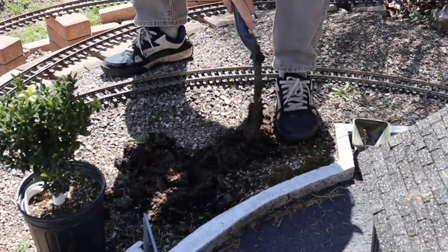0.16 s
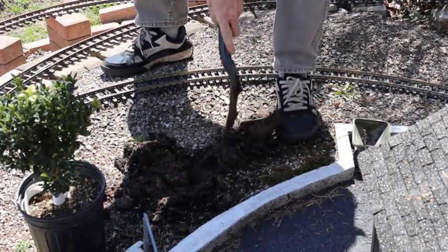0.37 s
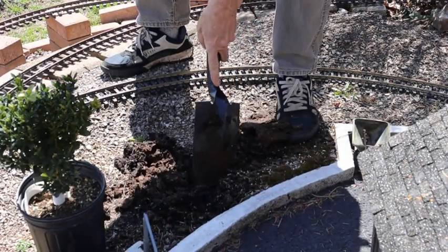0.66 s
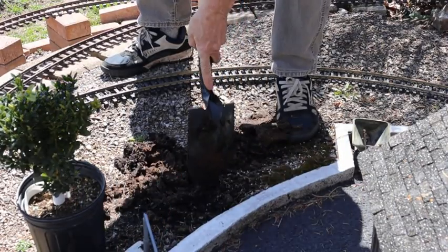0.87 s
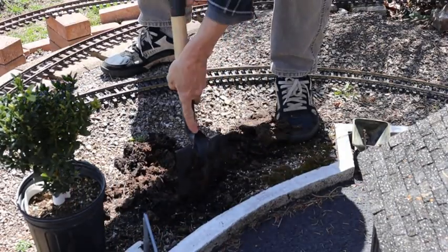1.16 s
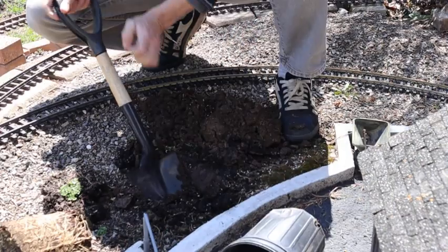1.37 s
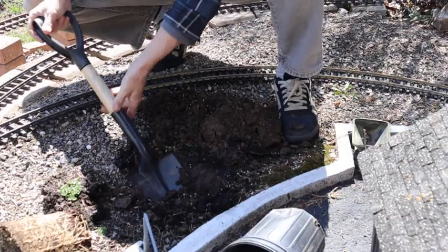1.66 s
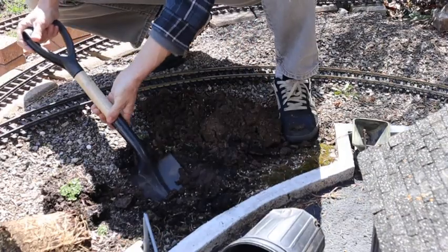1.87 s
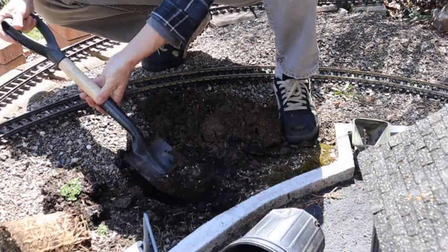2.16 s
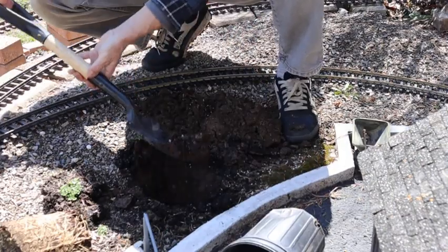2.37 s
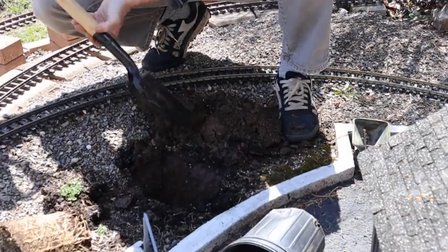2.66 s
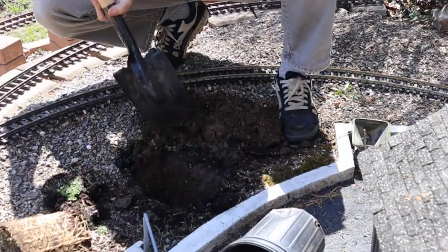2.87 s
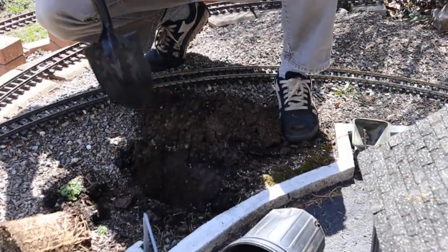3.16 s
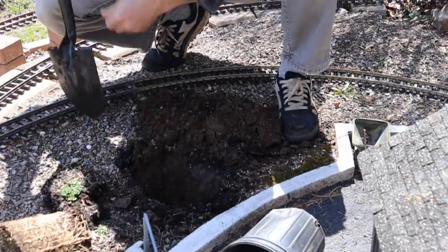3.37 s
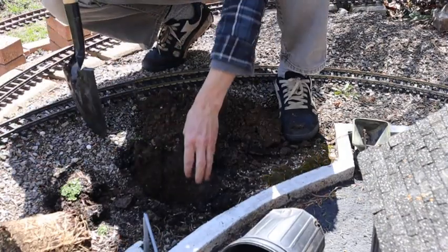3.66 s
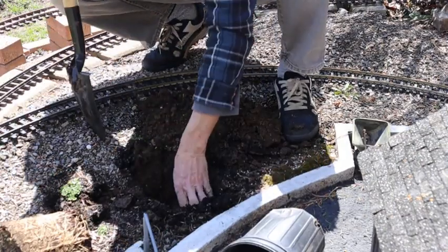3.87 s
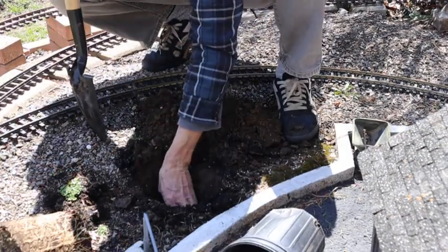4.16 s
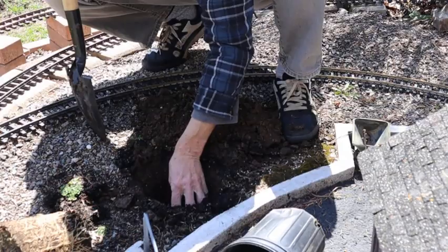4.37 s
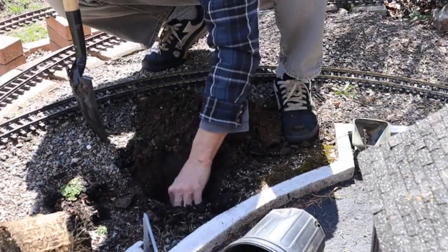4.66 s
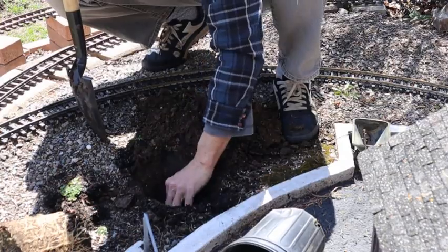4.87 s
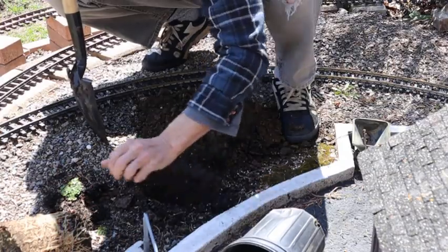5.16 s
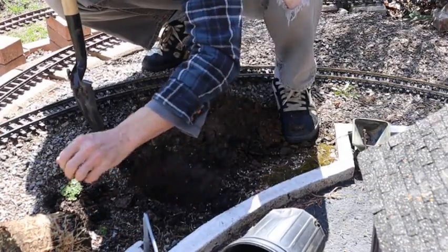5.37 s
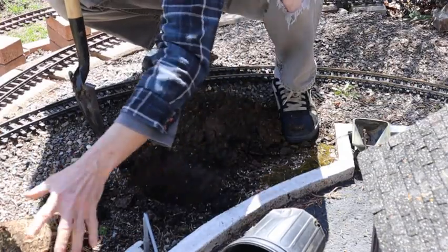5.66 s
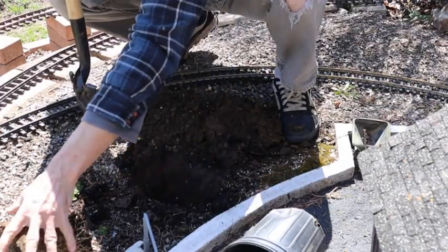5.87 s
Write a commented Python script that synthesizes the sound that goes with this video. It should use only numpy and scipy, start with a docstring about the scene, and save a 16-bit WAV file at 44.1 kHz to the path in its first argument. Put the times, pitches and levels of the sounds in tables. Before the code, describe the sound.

Close to the microphone, a small spade scrapes faintly in soil and gravel, then bites with bright crunches and a very loud, dull woody knock with cracking stones. Softer scrapes and tiny stone ticks follow. The blade is stabbed upright with a brief metallic clang and a gritty snap, then a hand rustles soil delicately. Quiet open garden, distant town wash and light low wind, nearly mono.

```python
"""Spade in garden soil

A small steel spade works soil beside gravel, close to a camera on a stand: filtered noise crackles as grit.
Noise bursts are cracking stones, damped low tones are knocks, and dying sines are the blade's clangs and pings.
The blade is stuck upright with a clang, then a hand rustles the soil. Hard blows shake the camera stand.
Distant town wash and light wind, both shaped noise, fill the garden."""
import sys
import numpy as np
from scipy import signal
from scipy.fft import rfft, irfft, next_fast_len
from scipy.io import wavfile
from scipy.ndimage import uniform_filter1d

SR = 44100
rng = np.random.default_rng(int(sys.argv[2]) if len(sys.argv) > 2 else 0)


def bounce(signal):
    """Save signal as a 16-bit WAV file at the path given by the first command-line argument."""
    frames = np.transpose(np.atleast_2d(signal))
    limited = np.clip(frames, -1, 1)
    pcm = np.round(limited * 32767).astype(np.int16)
    wavfile.write(sys.argv[1], SR, pcm)


N = 265923

# Basic colour of grit, before each layer's own tilt. Each row: frequency in Hz, relative level in dB.
GRIT_COLOUR = [(600, -30), (1100, 0), (1700, 2), (2400, -0.5), (3600, -0.5), (5450, -4), (6100, -11),
               (6900, -6.5), (9000, -8), (11700, -8), (14500, -14.5), (16500, -35)]
# Stones and grit cracking. Each row: start in seconds, level in dB before the layer weights, colour in Hz.
STONE_CRACKS = [(0.082, -33, 1470), (0.39, -37, 4000), (1.025, -13, 3100), (1.066, -13.5, 3700),
                (1.075, -15.5, 11000), (1.142, -35, 7360), (1.212, -32.5, 1610), (1.322, -25, 2240),
                (1.3645, -40, 1980), (1.386, -26, 9100), (1.405, -25, 1850), (1.418, -25, 3480),
                (1.424, -27, 2440), (1.4437, -17, 1670), (1.4448, -14, 1750), (1.4507, -5.5, 1820),
                (1.4584, -3, 1720), (1.463, -39, 1850), (1.5, -25, 1720), (1.517, -29, 4040),
                (1.526, -28, 7040), (1.55, -24, 1760), (1.62, -36, 3000), (1.6922, -27, 4500),
                (1.965, -27, 7000), (1.9731, -19.5, 2420), (1.978, -25, 5160), (1.9837, -23.5, 2430),
                (2.007, -32, 2240), (2.027, -27.5, 4600), (2.0654, -30.5, 2570), (2.114, -33.5, 4400),
                (2.136, -35.5, 1750), (2.724, -41, 8900), (2.882, -33, 3520), (3.3869, -7.5, 1530),
                (3.3872, -10, 4700), (3.5677, -9, 3350), (3.6133, -25, 8500), (3.669, -25.5, 9400),
                (3.95, -43, 6900), (3.985, -34, 2500), (4.523, -38.5, 4580), (5.099, -38.5, 7900),
                (5.144, -36, 4600), (5.1825, -33, 4460), (5.2243, -35, 4600), (5.243, -25, 10100),
                (5.386, -41, 8920), (5.483, -36, 8000), (5.5037, -30.5, 8900), (5.5301, -27.5, 8900),
                (5.584, -28.5, 6470), (5.615, -32, 4530), (5.64, -32, 5250), (5.685, -32.5, 3000),
                (5.728, -24.5, 2620), (5.731, -26, 8000), (5.742, -40, 2500), (5.822, -39, 3500),
                (5.8535, -30, 3180)]


def gain_of(db):
    """Decibels to amplitude gain."""
    return 10 ** (np.asarray(db) / 20)


def evened(x):
    """Scales to rms 1."""
    return x / np.sqrt(np.mean(x ** 2) + 1e-20)


def add(mix, s, sound):
    """Mixes a sound in at s seconds, cut off at the end of the mix."""
    part = mix[round(s * SR):][:len(sound)]
    part += sound[:len(part)]


def coloured(x, points):
    """Filters x by a gain curve through points (Hz, dB), straight over log frequency."""
    size = next_fast_len(len(x))
    f, db = np.transpose(points)
    hz = np.fft.rfftfreq(size, 1 / SR)
    gain = gain_of(np.interp(np.log(hz + 1), np.log(f), db))
    return irfft(rfft(x, size) * gain, size)[:len(x)]


def ring(modes, seconds, rise, tilt_db=0):
    """Sum of dying sines (Hz, dB, t60 s) with a soft start; tilt_db lifts the first mode."""
    t = np.arange(round(seconds * SR)) / SR
    total = np.zeros(len(t))
    for i, (hz, db, t60) in enumerate(modes):
        lift_db = tilt_db if i == 0 else 0
        total += gain_of(db + lift_db - 60 * t / t60) * np.sin(2 * np.pi * hz * t)
    return total * (1 - np.exp(-t / rise))


def garden():
    """A distant wash whose bands drift in patches, and lumpy wind in the bass: both are shaped noise."""
    # Colour of the wash. Each row: frequency in Hz, relative level in dB.
    wash_colour = [(41, -41), (70, -5), (118, -1), (145, -8.5), (205, -6.5), (252, -10), (488, -8.5),
                   (688, -10), (826, -10), (2010, -21), (2840, -25.5), (3260, -28.5), (14700, -35.5),
                   (16500, -33)]
    # Swell of the wind. Each row: time in seconds, level in dB.
    wind_curve = [(0.0, -59), (1.07, -56), (1.17, -64), (2.84, -64), (3.368, -56), (6.03, -55)]
    wash_db = -49
    frames = N // 256 + 5
    real, imag, patches = rng.standard_normal((frames, 513, 3)).T
    # smoothed over frequency, then over time
    patches = evened(uniform_filter1d(uniform_filter1d(patches, 12, 0), 16, 1))
    spectrum = (real + 1j * imag) * gain_of(1.03 * patches)
    drifting = signal.istft(spectrum, nperseg=1024, noverlap=768)[1][:N]
    wash = evened(coloured(drifting, wash_colour))

    s, wind_db = np.transpose(wind_curve)
    rumble = coloured(rng.standard_normal(N), [(8, -30), (20, 16.5), (35, -7), (60, 11.5), (90, -30.0)])
    wind = evened(rumble) * gain_of(np.interp(np.arange(N) / SR, s, wind_db))
    return gain_of(wash_db) * wash + wind


def stand():
    """The camera stand hums in its low modes, each hum with a soft swell after a jolt."""
    # Modes of the stand. Each row: frequency in Hz, relative level in dB, t60 in seconds.
    stand_modes = [(59.5, -10.5, 0.53), (87, -1.5, 0.6), (100, -5, 0.46), (107.7, -2, 0.86)]
    # Jolts through the ground. Each row: start in seconds, level in dB, lift of the lowest mode in dB.
    jolts = [(1.216, -49.5, 23.5), (1.459, -32, -18), (1.508, -31.5, -11), (1.57, -39, -11),
             (3.398, -33, -10), (3.449, -29, 8)]
    out = np.zeros(N)
    for s, db, tilt_db in jolts:
        add(out, s, gain_of(db) * ring(stand_modes, seconds=1.2, rise=0.017, tilt_db=tilt_db))
    return out


def pings():
    """Small stones slide off the lifted blade, each ringing one short note."""
    # The notes. Each row: start in seconds, level in dB, pitch in Hz.
    notes = [(2.724, -50, 2120), (2.738, -45, 2070), (2.783, -46, 2450), (2.79, -50, 3950),
             (2.882, -44, 3800)]
    t60_s = .08
    out = np.zeros(N)
    for s, db, hz in notes:
        add(out, s, ring([(hz, db, t60_s)], seconds=.1, rise=.001))
    return out


def clangs():
    """The steel blade meets stone and rings in its modes until the soil grips it."""
    # Modes of the blade. Each row: frequency in Hz, relative level in dB, t60 in seconds.
    blade_modes = [(1095, -5.5, 0.64), (1555, -11, 0.3), (1948, -8, 0.27), (2096, -13, 0.2),
                   (2126, -9, 0.25), (2395, -9, 0.13), (2578, -4, 0.19), (2765, -12, 0.17), (4152, -5, 0.1)]
    # Blows on stone. Each row: start in seconds, level in dB, seconds until soil stops the blade,
    # lift of the lowest mode in dB.
    blows = [(3.388, -27, 0.22, -4.5), (3.569, -29.5, 0.039, -25)]
    out = np.zeros(N)
    for s, db, seconds, low_db in blows:
        sound = ring(blade_modes, seconds, rise=0.0012, tilt_db=low_db)
        grip = np.minimum(np.linspace(8, 0, len(sound)), 1)  # fades over the last eighth
        add(out, s, gain_of(db) * sound * grip)
    return out


def knocks():
    """Blade and shaft on packed soil: a low, heavily damped wobble, roughened by crushed soil."""
    # The knocks. Each row: start in seconds, peak in dB, pitch in Hz.
    dull_knocks = [(1.024, -31, 604), (1.143, -24.5, 317), (1.169, -19, 423), (1.174, -24, 454),
                   (1.318, -26.5, 430), (1.364, -19.5, 456), (1.401, -18, 447), (1.417, -12.5, 445),
                   (1.443, -17, 517), (1.448, -4, 501), (1.451, -1.5, 462), (1.454, -17, 278),
                   (1.458, -7.5, 468), (1.466, -18, 414), (1.503, -31, 390), (1.52, -29, 415),
                   (1.547, -31.5, 580), (1.691, -29, 460), (1.705, -29.5, 388), (1.725, -36, 346),
                   (1.973, -30.5, 405), (1.99, -32, 378), (3.387, -23.5, 340), (3.387, -17, 888),
                   (3.393, -30, 220), (5.728, -28.5, 920)]
    cycles, rise_s = 9.5, .004  # cycles of the main pitch for a 60 dB decay, soft start
    rough, length_s = .3, .12  # rms depth of the random flutter, time allotted to a knock
    out = np.zeros(N)
    spread = rng.random((len(dull_knocks), 2))
    noise = rng.standard_normal((len(dull_knocks), round(length_s * SR)))
    for (s, db, hz), (low, high), z in zip(dull_knocks, spread, noise):
        t60 = cycles / hz
        below = (hz * (0.55 + 0.15 * low), -11, t60)
        above = (hz * (1.45 + 0.4 * high), -13, t60)
        wobble = ring([(hz, 0, t60), below, above], length_s, rise_s)
        crush = evened(coloured(z, [(hz, 0), (4 * hz, -12), (16 * hz, -40)]))
        sound = coloured(wobble * (1 + rough * crush), [(hz / 4, -30), (hz / 2, 0)])  # bass cut
        add(out, s, gain_of(db) * sound / abs(sound).max())
    return out


def bells():
    """The short rings of the grit, one row for each, together of energy 1."""
    # Where grit rings. Each row: frequency in Hz, width in Hz (wider dies faster), relative level in dB.
    grit_modes = [(2450, 90, 0), (3800, 150, -8), (4600, 80, -5), (5180, 130, -4), (7900, 120, -8),
                  (8800, 140, -7), (10200, 160, -8)]
    t = np.arange(2000) / SR
    rows = [gain_of(db) * np.exp(-np.pi * width * t) * np.sin(2 * np.pi * hz * t)
            for hz, width, db in grit_modes]
    return np.array(rows) / np.linalg.norm(rows)


def cracks():
    """Each crack is a quick noise burst; the stone it splits has its own pitch, and the grit around rings on."""
    t60_s, t60_per_db = .017, .00025  # decay of a 0 dB crack, and seconds shorter for each dB less
    sing_db = -10  # how strongly a crack sets the grit ringing
    out, t = np.zeros(N), np.arange(4000) / SR
    noise = rng.standard_normal((len(STONE_CRACKS), len(t)))
    for (s, db, hz), z in zip(STONE_CRACKS, noise):
        decay = gain_of(-60 * t / (t60_s + t60_per_db * db))
        shape = decay * (1 - np.exp(-t / 0.0004))
        body = signal.lfilter(*signal.iirpeak(hz, 4, SR), z * shape)
        body *= np.linalg.norm(shape) / np.linalg.norm(body)  # as much energy as the envelope
        burst = coloured(z, [(hz / 4, -10), (hz, 0), (4 * hz, -5)])
        burst = evened(coloured(burst, GRIT_COLOUR)) * shape
        add(out, s, gain_of(db) * (.45 * burst + .38 * body))
    return out + gain_of(sing_db) * signal.oaconvolve(out, bells().sum(0))[:N]


def crumbling(per_s, spread_db, grain_s, hiss, count=1):
    """Noise whose level jumps with each grain that breaks, over a steady hiss; a row for each kind of grain."""
    size = gain_of(spread_db * np.minimum(rng.exponential(1, (N, count)), 3))
    breaks = rng.random((N, count)) < per_s / SR
    bursts = signal.lfilter([1], [1, -np.exp(-1 / (grain_s * SR))], (size * breaks).T)
    level = hiss + evened(bursts) + 0.5 * evened(bursts[0])  # all kinds also follow the first
    return evened(level * rng.standard_normal((N, count)).T)


def sifted(rows):
    """Each kind of grain sounds in its own band, from small stones near 1 kHz up to dust near 14 kHz."""
    size, last = next_fast_len(N), len(rows) - 1
    khz = np.fft.rfftfreq(size, 1 / SR) / 1000
    place = np.log(khz + 1e-3) / np.log(14) * last
    distance = place.clip(0, last) - np.arange(len(rows))[:, None]
    bands = np.cos(np.pi / 2 * np.clip(distance, -1, 1))  # neighbours crossfade
    return irfft((rfft(rows, size) * bands).sum(0), size)[:N]


def stirring(t):
    """How much grit moves: the power of the strokes and of the spray thrown up by each crack."""
    # Grit moving on the blade, later under the hand: one curve for each stroke.
    # Each row of a curve: time in seconds, level in dB.
    stroke_curves = [
        [(0, -50), (.04, -66)],
        [(.2, -59.5), (.35, -55.5), (.391, -52), (.425, -56.5), (.477, -52.5), (.507, -63), (.637, -56),
         (.7, -63)],
        [(.985, -62), (1.026, -40.5), (1.042, -39), (1.062, -28.5), (1.096, -36), (1.139, -27), (1.165, -32),
         (1.189, -60)],
        [(1.18, -53), (1.307, -48), (1.325, -40.5), (1.347, -58), (1.379, -48), (1.435, -43.5), (1.521, -43.5),
         (1.58, -58), (1.63, -75)],
        [(1.66, -60), (1.696, -45.5), (1.798, -51.5), (1.865, -53.5), (1.924, -52), (1.956, -53), (1.981, -39),
         (2.0, -48), (2.07, -60)],
        [(2.69, -65), (2.74, -51.5), (2.78, -54), (2.83, -63), (2.887, -55.5), (2.943, -53), (2.975, -65)],
        [(3.39, -30.5), (3.42, -50), (3.47, -60), (3.552, -62), (3.562, -23), (3.572, -33), (3.59, -38),
         (3.64, -52), (3.68, -73)],
        [(3.62, -61), (3.67, -50.5), (3.726, -44), (3.767, -50.5), (3.829, -42.5), (3.871, -45.5), (3.933, -65)],
        [(3.933, -53), (3.951, -53), (4.015, -55), (4.041, -47.5), (4.061, -54), (4.097, -50), (4.16, -64)],
        [(5.07, -60), (5.102, -55), (5.182, -46), (5.21, -54.5), (5.236, -42.5), (5.294, -58.5)],
        [(5.29, -58.5), (5.436, -55), (5.47, -59), (5.511, -46.5), (5.555, -53.5), (5.613, -48.5), (5.713, -57),
         (5.86, -62)],
    ]
    spray_db, spray_slope = -28, .8  # level after a 0 dB crack, and dB for each dB of crack
    rise_s, t60_s = 0.0015, 0.062
    power = sum(gain_of(2 * np.interp(t, *np.transpose(c), -200, -200)) for c in stroke_curves)
    after = t[:SR // 4]
    spray = (gain_of(-60 * after / t60_s) * (1 - np.exp(-after / rise_s))) ** 2
    for s, db, _ in STONE_CRACKS:
        add(power, s, gain_of(2 * (spray_db + spray_slope * db)) * spray)
    return power


def strokes():
    """Coarse and fine grit crackle and now and then ring; heavier clods rumble under them."""
    # Colour of the clods. Each row: frequency in Hz, relative level in dB.
    clod_colour = [(150, -16), (300, 8.5), (450, 6), (700, 7.5), (1200, -5), (2200, -45)]
    # What is moved, held until the next row. Each row: start in seconds, clods against the grit in dB,
    # brightness from 0 (coarse) to 1 (fine), ringing in dB.
    stuff = [(0, -5, 0.44, -17), (0.978, -10.5, 0.67, -7), (1.1, -6.5, 0.64, -6), (1.19, 0.5, 0.47, -8),
             (1.651, -12, 0.47, -9.5), (2.5, -27, 0.73, -1)  , (3.37, -1.5, 0.42, 2),
             (3.54, -18.5, 0.78, 1), (3.601, -19, 0.8, -0.5), (4.901, -22, 0.77, -5)]
    trickle_db = -62  # loose soil never quite stops settling
    t = np.arange(N) / SR
    coarse = sifted(crumbling(per_s=200, spread_db=4.5, grain_s=.002, hiss=.8, count=5))
    fine = sifted(crumbling(per_s=250, spread_db=4, grain_s=.0012, hiss=.8, count=8))
    rings = bells()
    chips = crumbling(per_s=300, spread_db=1.5, grain_s=.002, hiss=1.5, count=len(rings))
    song = evened(signal.oaconvolve(chips, rings, axes=1).sum(0)[:N])
    coarse = evened(coloured(coloured(coarse, GRIT_COLOUR), [(4500, -11.0), (7000, -16.5)]))
    fine = evened(coloured(coloured(fine, GRIT_COLOUR), [(4500, -10.5), (7000, -1.5)]))
    lumps = crumbling(per_s=150, spread_db=3, grain_s=.006, hiss=1.2)[0]
    clods = evened(coloured(lumps, clod_colour))

    start, *columns = np.transpose(stuff)
    row = np.searchsorted(start, t, "right").clip(1) - 1
    clod_db, bright, song_db = (c[row] for c in columns)
    bright = np.clip(bright, 0, 1)
    soil = np.sqrt(1 - bright ** 2) * coarse + bright * fine + gain_of(clod_db) * clods
    power = stirring(t)
    moving = soil * np.sqrt(power + gain_of(2 * trickle_db))
    return moving + gain_of(song_db) * song * np.sqrt(power)


def walls(x):
    """Short scatter off ground, kerb and bricks: sparse taps of random sign that die fast."""
    taps = np.zeros(6000)
    at = np.arange(100, 5980, 20) + rng.integers(0, 20, 294)  # one tap in every 20 samples
    taps[at] = rng.choice([-1., 1.], len(at)) * gain_of(-60 * at / SR / 0.094)  # t60 94 ms
    return signal.oaconvolve(x, taps / np.linalg.norm(taps))[:N]


def treble_difference(x):
    """A faint treble layer made from x with scrambled phases, added to one channel and taken from the other."""
    # Colour of the layer. Each row: frequency in Hz, gain in dB.
    treble_colour = [(3000, -56), (4500, -13), (7000, -6), (16000, -7)]
    _, _, z = signal.stft(x, SR, nperseg=128)
    turn = np.exp(2j * np.pi * rng.random(z.T.shape).T)
    turned = signal.istft(z * turn, SR, nperseg=128)[1][:N]
    return coloured(turned, treble_colour)


def scene():
    """Nearly mono; a faint treble difference between channels is made from the garden and the cracks."""
    sharp, around = cracks(), garden()
    hits = sharp + knocks() + pings()
    scatter = gain_of(-13) * walls(hits)
    mid = hits + scatter + clangs() + strokes() + stand() + around
    side = treble_difference(sharp + around)
    return np.array([mid + side, mid - side])


def record(dry):
    """Peaks are rounded off near full scale; then a steep low-pass limits the treble."""
    edge_hz = 15900
    held = dry / (1 + dry ** 6) ** (1 / 6)
    lowpass = signal.firwin(511, edge_hz, window=("kaiser", 9), fs=SR)
    return signal.oaconvolve(held, lowpass[None], "same")


dry = scene()
out = record(dry)
bounce(out)
```